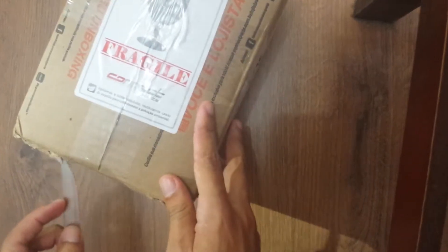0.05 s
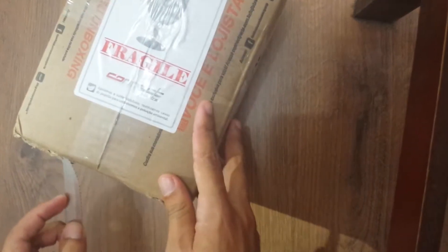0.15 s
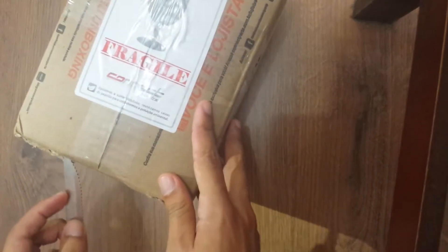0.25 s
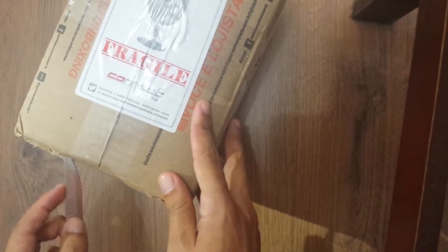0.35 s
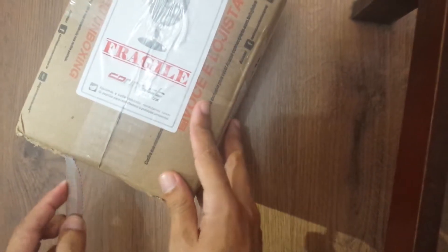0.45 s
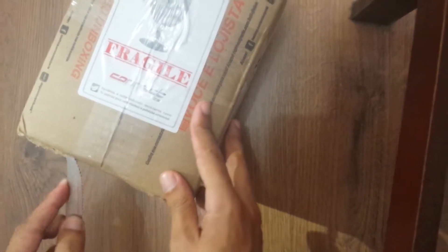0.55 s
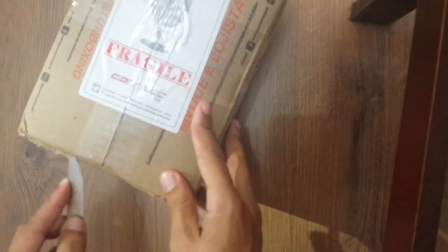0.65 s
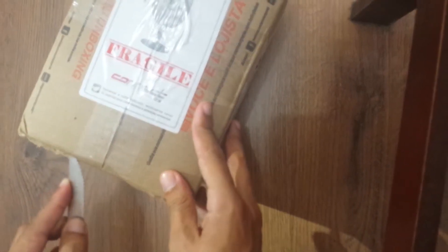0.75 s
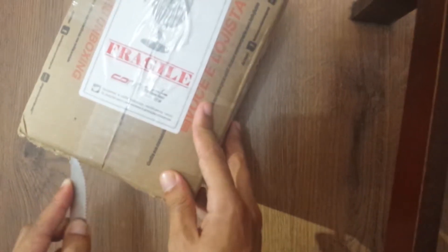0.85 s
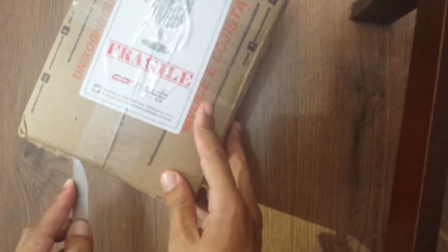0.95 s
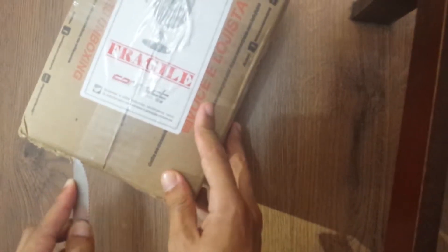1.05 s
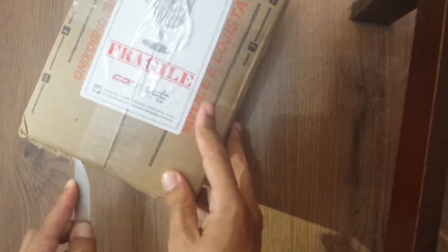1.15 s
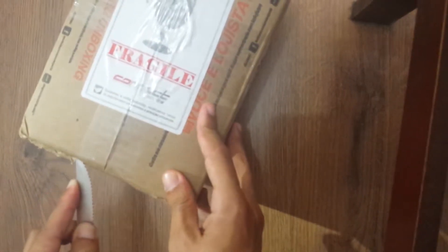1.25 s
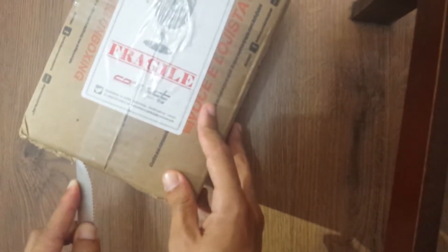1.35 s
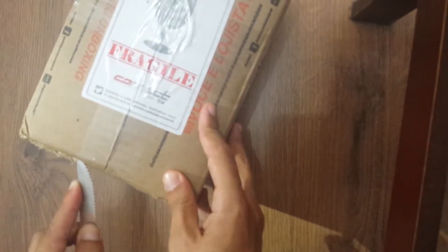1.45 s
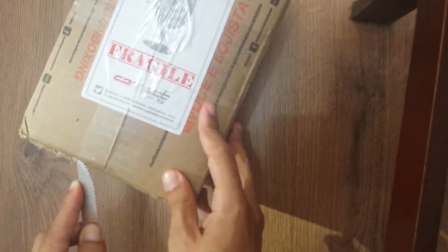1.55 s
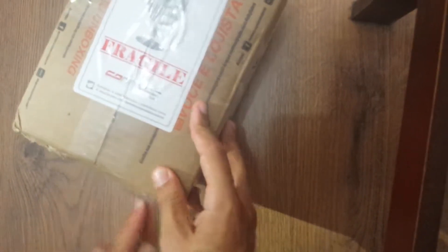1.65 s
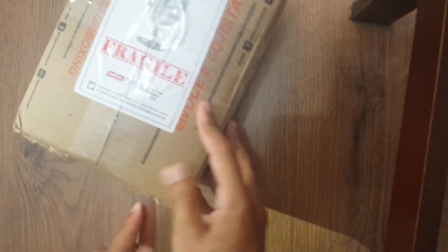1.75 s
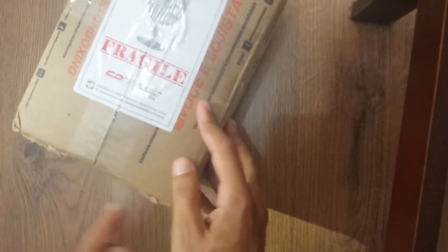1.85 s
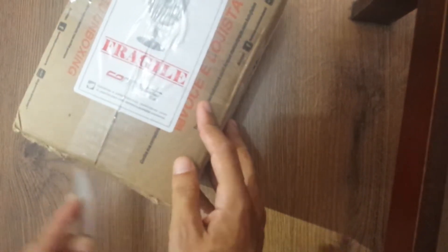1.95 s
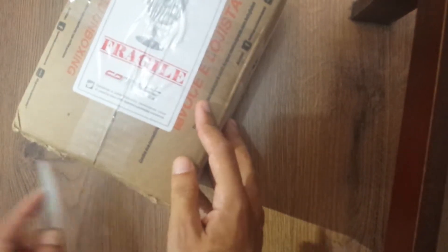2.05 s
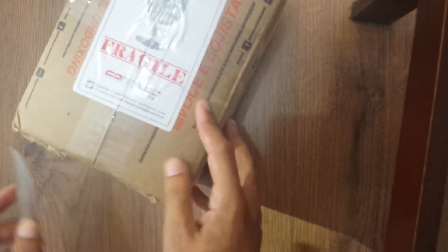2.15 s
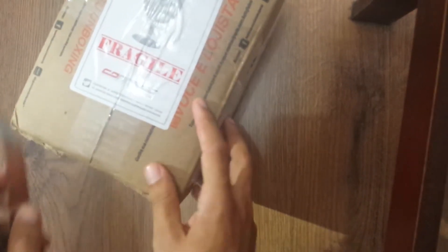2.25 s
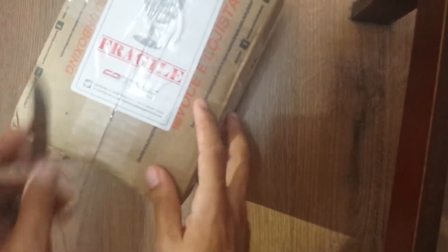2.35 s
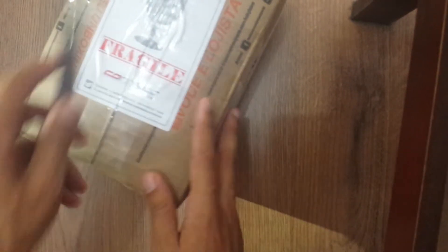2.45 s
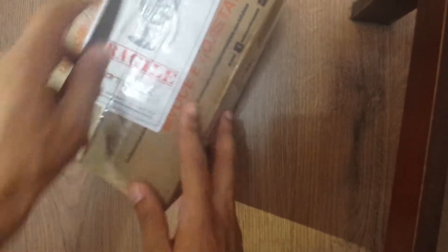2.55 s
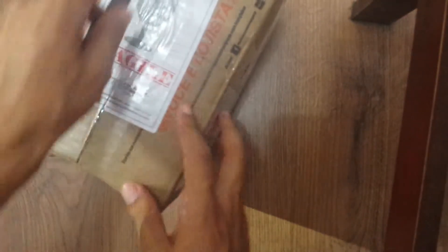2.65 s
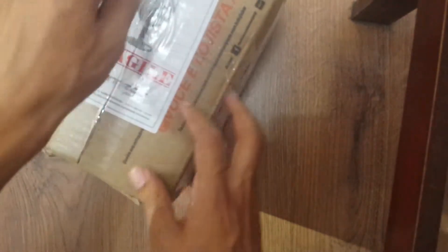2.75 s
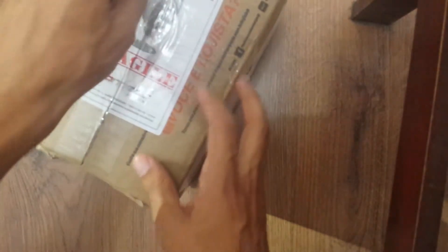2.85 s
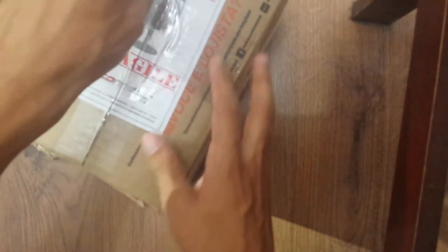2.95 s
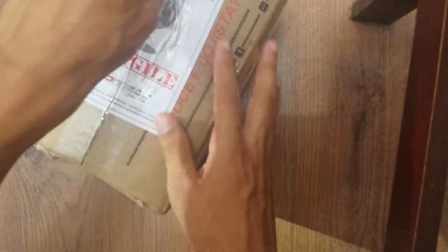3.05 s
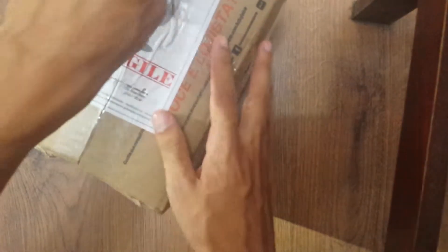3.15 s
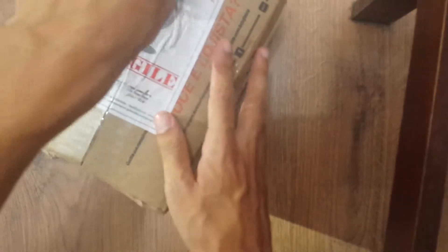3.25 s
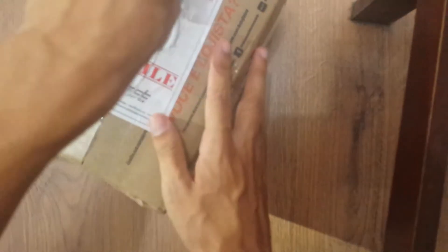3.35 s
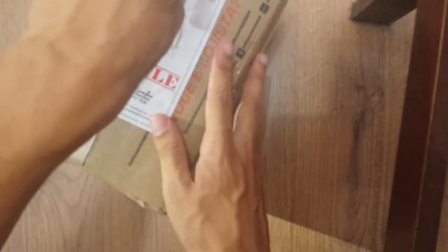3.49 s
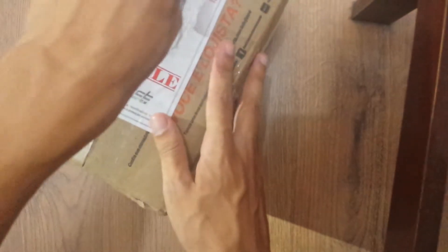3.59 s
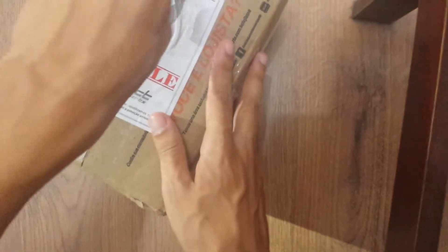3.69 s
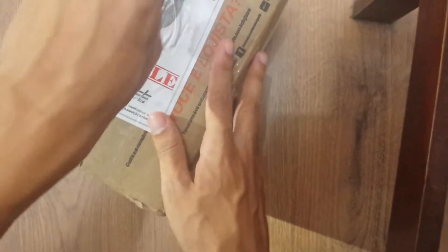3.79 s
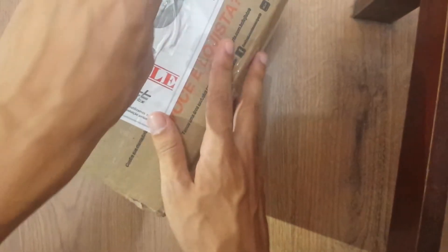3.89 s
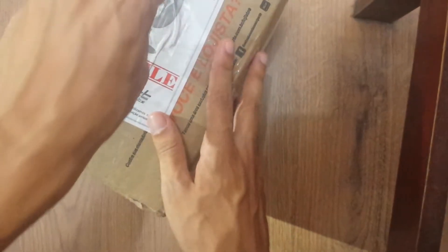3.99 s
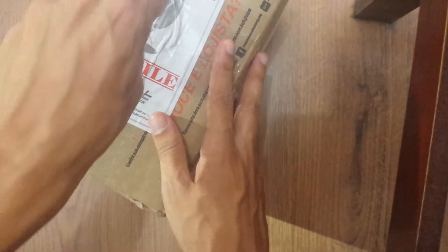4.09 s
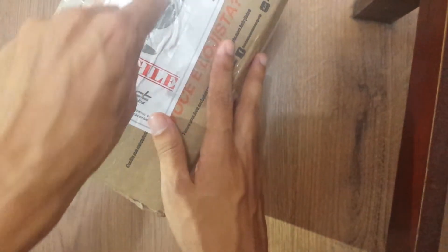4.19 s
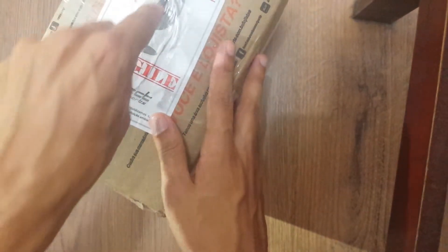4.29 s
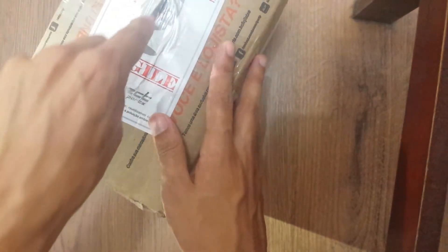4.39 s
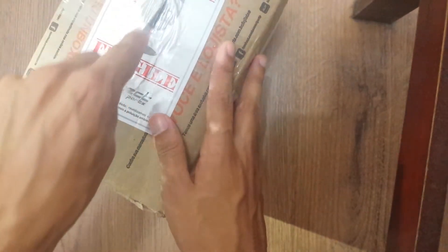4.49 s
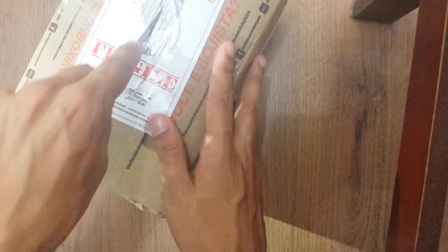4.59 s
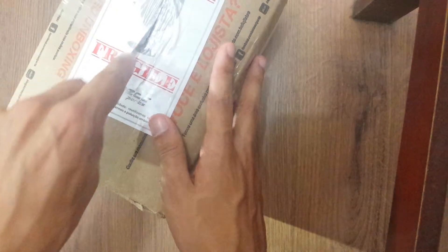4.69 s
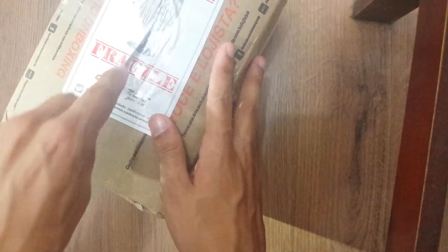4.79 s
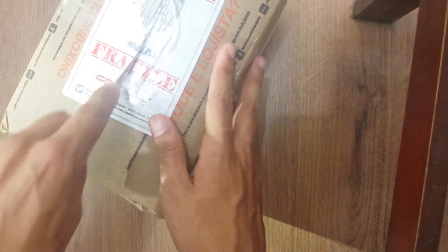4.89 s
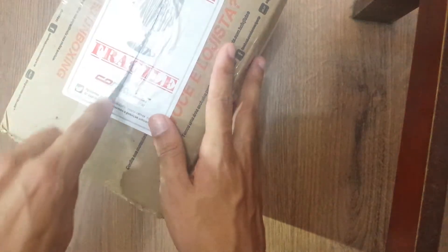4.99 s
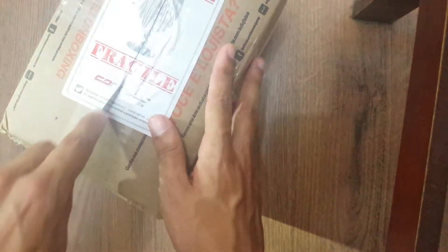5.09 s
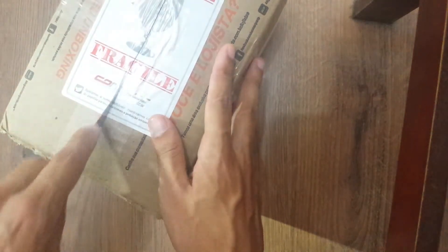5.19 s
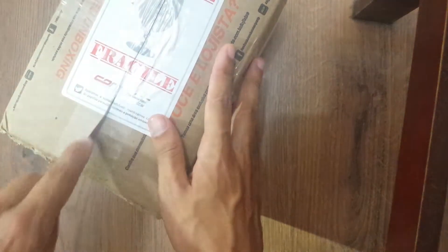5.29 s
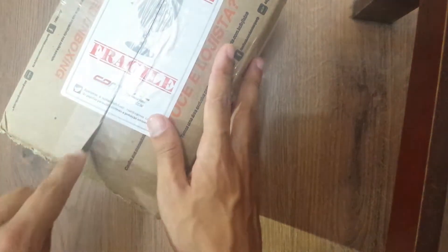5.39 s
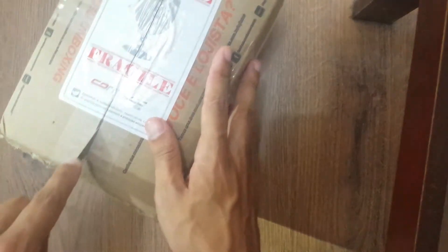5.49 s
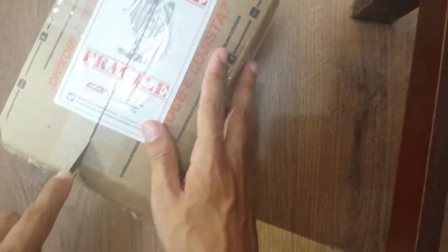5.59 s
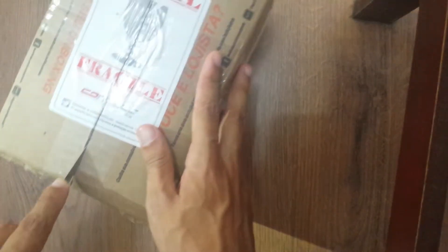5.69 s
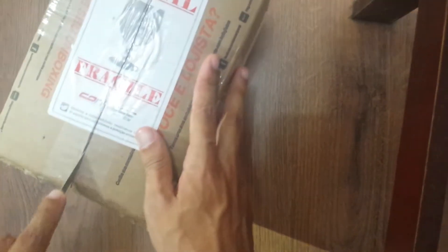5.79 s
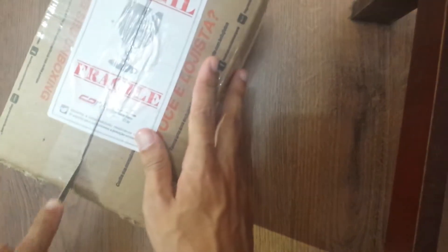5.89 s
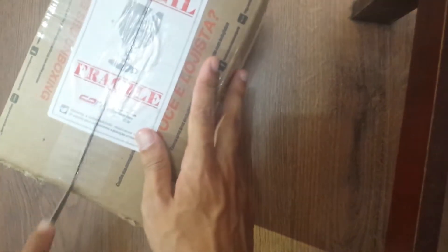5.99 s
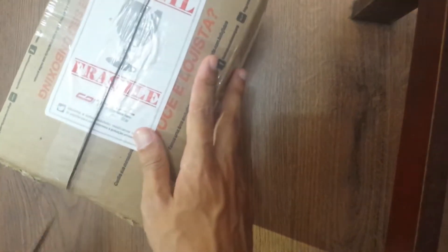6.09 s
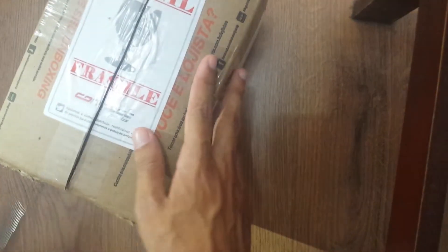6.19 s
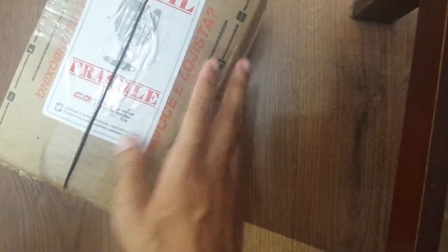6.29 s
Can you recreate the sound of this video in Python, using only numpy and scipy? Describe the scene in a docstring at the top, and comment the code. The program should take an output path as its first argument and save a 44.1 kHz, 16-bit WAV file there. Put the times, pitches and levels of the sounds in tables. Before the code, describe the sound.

In a small bare room with a faint electrical hum, a cardboard box is cut open near the microphone. Quiet finger rubs come first, then one sharp clack and short scrape of a knife on floorboards. The tip snaps through the tape, and a scratchy, crackling cut runs through tape and paper while the hollow box thumps underneath. A short high squeak and a final rip finish the cut.

```python
"""Fingers tick and scuff on a cardboard box. At 1.7 s a kitchen knife knocks and scrapes as it is picked
up from a wooden floor. At 3.6 s its tip pops through the taut box tape; the edge rasps along the seam
and through a paper label, the hollow box booming below. At 5.3 s the blade sticks and squeaks in the
film; at 6.1 s it tears out at the far end. Throughout: small bare room, faint mains hum."""
import sys
import numpy as np
from scipy import signal
from scipy.fft import rfft, irfft, next_fast_len
from scipy.io import wavfile
from scipy.ndimage import map_coordinates

SR = 44100
rng = np.random.default_rng(int(sys.argv[2]) if len(sys.argv) > 2 else 0)


def unload_audio(sound):
    """Save the sound as a 16-bit wav file, at the path given as the first command line argument."""
    columns = np.transpose(np.atleast_2d(sound))
    # keep every value between -1 and 1, then stretch to whole-number steps
    steps = np.round(np.clip(columns, -1, 1) * 32767)
    wavfile.write(sys.argv[1], SR, steps.astype(np.int16))


N = 279324

# Event levels are relative within a table; spectra are per Hz.
CUT_EFFORT = [(3.61, -44), (3.84, -48.5), (3.95, -39), (4.14, -42.5), (4.3, -40.5), (4.551, -42),
              (4.68, -49), (4.76, -43), (4.89, -42.5), (5.05, -43), (5.24, -36), (5.45, -36), (5.57, -43.5),
              (5.78, -40.5), (5.92, -49.5), (5.99, -41), (6.137, -31.5)]  # draw along the seam: t/s, level/dB
PAPER_GAINS_DB = (-1.5, 0.5, -2)  # edge in the label: rasp/dB, box/dB, hiss/dB
TAPE_GAINS_DB = (-1, -5, 2)  # edge in bare tape: rasp/dB, box/dB, hiss/dB
FIBRE_TEARS = [(3.626, 0.014, -26), (3.972, 0.0022, -37), (4.2, 0.016, -33), (5.09, 0.014, -24.5),
               (6.135, 0.0069, -30)]  # fibres tear in a rush: t/s, half length/s, level/dB
RASP_SPECTRUM = [(410, -24), (700, -9), (922, -5.5), (1210, -9.5), (3160, -8.5), (3640, -6), (7010, -4.5),
                 (8310, -7.5), (13300, -5), (15000, -31), (16000, -48)]  # edge in the seam: f/Hz, level/dB
FILM_MODES = [(6600, 2800, -12), (8450, 1300, 2), (9940, 1200, -5.5), (10800, 2300, -10),
              (13100, 1300, -17)]  # taut tape: f/Hz, width/Hz, level/dB
BOX_MODES = [(209.6, 29, -4), (293, 17, -2), (330.4, 23, -2.5), (509, 157, -7), (636, 85, -6),
             (666, 33, -0.5), (786, 66, -2.5), (956, 35, -3), (1060, 42, -5), (1316, 310, -13.5),
             (1820, 120, -7), (1920, 840, -14.5)]  # hollow box: f/Hz, width/Hz, level/dB
# light handling ticks first, then tape and paper cracking under the knife: t/s, crack/dB, box/dB
SNAPS_AND_TICKS = [(0.085, -36.5, -44), (0.863, -43.5, -58), (0.988, -34, -65), (1.281, -56, -64),
                   (3.287, -44, -40.5), (3.479, -36, -59), (3.499, -25, -36), (3.603, -6, -45),
                   (3.675, -14.5, -38.5), (3.778, -24.5, -63), (3.9565, -8.5, -35), (3.971, -9.5, -55),
                   (4.057, -21.5, -25), (4.180, -8.5, -22), (4.219, -12, -25), (4.3137, -21, -27.5),
                   (4.446, -27, -28.5), (4.7145, -28, -35), (4.9772, -18, -24), (5.070, -19, -19),
                   (5.076, -9.5, -13.5), (5.086, -10.5, -16), (5.101, -16, -28.5), (5.512, -21, -53),
                   (5.550, -22, -45), (5.964, -25.5, -42), (6.115, -13, -30.5), (6.132, -10.5, -27)]
CRACK_SPECTRUM = [(250, -19), (500, -8.5), (1000, -13.5), (2000, -8.5), (3200, -9.5), (4000, -9.5),
                  (5500, -8), (8600, -3.5), (13000, -8.5), (16000, -10.5)]  # one snap or tick: f/Hz, level/dB
BLADE_GRABS = [(5.255, 0.004, -34), (5.305, 0.019, -26.5), (5.339, 0.0073, -19.5), (5.351, 0.0056, -18.5)]  # blade sticks in the film: t/s, half length/s, level/dB
BLADE_MODES = [(8680, 190, -6), (10350, 100, -4), (13200, 35, -10), (13200, 34, 5), (14360, 45, -2),
               (14280, 54, 2), (15300, 41, -2)]  # thin steel: f/Hz, width/Hz, level/dB
SQUEAL_SPECTRUM = [(2940, -66), (5000, -47), (7380, -18), (8290, -7), (9880, -1), (10900, -3), (13300, 8),
                   (15100, 0.5), (16000, -23)]  # film on steel: f/Hz, level/dB

FLOOR_CLACKS = [(1.702, -6), (1.7038, -15), (1.713, -13.5), (1.722, -14), (1.7373, -8.5), (1.7579, -24)]  # blade hits the floor: t/s, level/dB
FLOOR_SLIDES = [(1.698, 0.051, -27), (1.85, 0.012, -38), (1.948, 0.0031, -45.5)]  # one slide, two grazes: t/s, length/s, level/dB
FLOOR_SPECTRUM = [(40, -30), (70, -7), (150, -16), (212, 3), (310, -10), (420, -21), (610, -11), (760, -15),
                  (1300, -11), (3000, -14.5), (5500, -9.5), (8200, -5.5), (13000, -14), (15800, -21)]  # blade on boards: f/Hz, level/dB
PANEL_BUMPS = [(1.281, -38, 307), (1.757, -28.5, 265), (2.381, -42, 310), (2.484, -43, 293),
               (2.723, -45.5, 308), (3.108, -44.5, 214), (3.271, -35.5, 170), (3.497, -47, 233),
               (4.056, -21, 293), (4.184, -23.5, 367), (4.933, -31, 234), (5.092, -17.5, 208),
               (6.139, -23.5, 175)]  # box flexes: t/s, level/dB, f/Hz
BOX_BRUSHES = [(0.1, 0.016, -52), (0.26, 0.0094, -55), (0.52, 0.11, -68), (0.83, 0.068, -65.5),
               (0.975, 0.02, -53.5), (1.565, 0.01, -63.5), (2.43, 0.14, -62.5), (2.63, 0.082, -54.5),
               (2.98, 0.19, -64), (3.42, 0.27, -67.5)]  # fingers and blade on cardboard: t/s, half length/s, level/dB
BRUSH_SPECTRUM = [(250, -14), (450, -6.5), (750, -8.5), (1200, -7.5), (2200, -14), (4000, -13),
                  (8400, -7.5), (13500, -16), (16000, -25)]  # skin on cardboard: f/Hz, level/dB
FINGER_SCUFFS = [(0.083, -53.5, 960, 0.21), (0.442, -60, 473, 0.16), (0.827, -58, 1280, 0.033),
                 (0.859, -47.5, 1500, 0.0072), (1.294, -58, 850, 0.015), (2.486, -42.5, 820, 0.02)]  # fingers shift: t/s, level/dB, f/Hz, 30 dB decay/s

HAND_HOLDS = [(1.6, 2.3, -65), (3.9, 1.6, -53), (6.12, 0.03, -45.5)]  # box rumbles under hand and knife: t/s, length/s, level/dB
RUMBLE_SPECTRUM = [(15, -4.5), (45, -23), (72, 2), (100, -4.5), (125, 3), (170, -13.5), (400, -52),
                   (1000, -94)]  # handling rumble: f/Hz, level/dB
AIR_SPECTRUM = [(20, -16), (45, -10.5), (75, -2), (125, -5.5), (190, -13), (285, -7), (370, -16.5),
                (480, -12.5), (700, -20.5), (1100, -19), (2000, -26), (4000, -25.5), (14500, -27),
                (16000, -32)]  # room air: f/Hz, level/dB
ECHO_DECAY = [(100, 0.4), (300, 0.49), (1000, 0.35), (4000, 0.34), (9000, 0.35), (15000, 0.27)]  # room decay: f/Hz, T60/s
ECHO_SPECTRUM = [(100, -7), (300, -1.5), (1000, -2.5), (4000, -1.5), (9000, -7.5), (12000, -9.5),
                 (15500, -17.5)]  # wall echo: f/Hz, level/dB
COHERENCE = [(25, 0.24), (70, 0.95), (130, 0.88), (250, 0.88), (500, 0.26), (1000, 0), (16000, 0.01)]  # diffuse field: f/Hz, left-right correlation/1
LEFT_SHADOW = [(150, -3), (350, 3.5), (700, -5), (2000, -7), (6000, -82), (13000, -39)]  # direct sound, left against right: f/Hz, level/dB


def cutting():
    """The edge parts film and fibres in dense slips; its grip wavers and shakes the box."""
    rasp_gain, box_gain, hiss_gain = seam_gains()
    grip = unit(amp(1.43 * wobble(30) + 2.96 * wobble(160)))
    slips = grip * friction(rate_hz=1400, spread_db=1.0, smooth=0.62)
    tearing = swells(FIBRE_TEARS) * friction(rate_hz=2100, spread_db=11, smooth=0.14)
    seam = coloured(rasp_gain * slips + tearing, RASP_SPECTRUM)
    hiss = hiss_gain * grip * friction(rate_hz=900, spread_db=-2.0, smooth=0.62)
    film = np.zeros(N)
    for hz, width_hz, db in FILM_MODES:  # modes come forward at random as the edge travels
        drift = unit(amp(3.1 * wobble(13)))
        film += amp(db) * resonate(hiss * drift, [(hz, width_hz, 0)])
    drag = amp(-3) * box_gain * grip * friction(rate_hz=580, spread_db=11.5, smooth=0.23)
    return seam + amp(-3.5) * film + resonate(drag + amp(-13) * tearing, BOX_MODES)


def seam_gains(label_from_s=3.82, label_to_s=5.24, edge_s=0.017):
    """Paper drags on the box, bare tape hisses; both follow the effort. Gains: rasp, box, hiss."""
    t = np.arange(N) / SR
    s, db = np.transpose(CUT_EFFORT)
    gate = strokes([(s[0], s[-1] - s[0], 0)], attack_s=0.031, release_s=0.0069)
    effort = amp(np.interp(t, s, db)) * gate
    in_label = (np.tanh((t - label_from_s) / edge_s) - np.tanh((t - label_to_s) / edge_s)) / 2
    return [effort * amp(tape + (paper - tape) * in_label)
            for paper, tape in zip(PAPER_GAINS_DB, TAPE_GAINS_DB)]


def snaps_and_ticks():
    """Light handling ticks, then tape and paper cracking under the knife; each rings the box."""
    cracks, kicks = np.zeros(N), np.zeros(N)
    for s, crack_db, box_db in list(SNAPS_AND_TICKS) + fibres():
        t60_s = 0.027 * 10 ** ((crack_db + 11) / 40)  # louder ones last longer
        add(cracks, s, amp(crack_db + 16.5) * fracture(t60_s, crumble=2.35))
        add(kicks, s, amp(box_db + 23) * fracture(t60_s=0.0052, crumble=0.98))
    return coloured(cracks, CRACK_SPECTRUM) + resonate(kicks, BOX_MODES)


def fibres(rate_hz=16, crack_db=9.5, box_db=-3.5):
    """Single fibres snap at random, as hard as the edge is pressed. Rows: t/s, crack/dB, box/dB."""
    s, db = np.transpose(CUT_EFFORT)
    hits = np.flatnonzero(rng.random(N) < rate_hz / SR)
    scatter_db = np.clip(rng.standard_normal((N, 2)), -2, 2)[hits]
    levels_db = np.interp(hits / SR, s, db)[:, None] + scatter_db + [crack_db, box_db]
    return [(at, crack, box) for at, (crack, box) in zip(hits / SR, levels_db) if s[0] < at < s[-1]]


def squeak(stutter_hz=165, depth_db=3):
    """Sticky film grabs the blade in stuttering bursts that ring the thin steel."""
    stutter = np.sin(2 * np.pi * stutter_hz * np.arange(N) / SR + wobble(60))
    grab = swells(BLADE_GRABS) * unit(amp(depth_db * stutter + 3 * wobble(900)))
    steel = resonate(grab * rng.standard_normal(N), BLADE_MODES)
    film = coloured(grab * rng.standard_normal(N), SQUEAL_SPECTRUM)
    return amp(-2) * steel + amp(0.5) * film


def knife_pickup():
    """The blade clacks on the boards and chatters as it slides off. Returns clacks, slide."""
    blows = np.zeros(N)
    for s, db in FLOOR_CLACKS:
        add(blows, s, amp(db + 14) * fracture(t60_s=0.011, crumble=1.0))
    contact = strokes(FLOOR_SLIDES, attack_s=0.0083, release_s=0.028)
    slide = contact * friction(rate_hz=1200, spread_db=1.5, smooth=0.41)
    return coloured(blows, FLOOR_SPECTRUM), coloured(slide, FLOOR_SPECTRUM)


def bumps(t60_s=0.037, rise_s=0.0031, lowpass_hz=900):
    """A soft push swings a cardboard panel for a few cycles and stirs the lower box modes."""
    panel, kicks = np.zeros(N), np.zeros(N)
    t = np.arange(SR // 8) / SR
    for s, db, hz in PANEL_BUMPS:
        envelope = amp(db + 5.5 - 60 * t / t60_s) * (1 - np.exp(-t / rise_s))
        add(panel, s, envelope * np.sin(2 * np.pi * hz * t))
        add(kicks, s, amp(db + 13) * fracture(t60_s=0.018, crumble=0.86))
    pushes = signal.lfilter(*signal.butter(2, lowpass_hz, fs=SR), kicks)
    return panel + resonate(pushes, BOX_MODES)


def brushing():
    """Skin slides lightly over cardboard."""
    rub = swells(BOX_BRUSHES) * friction(rate_hz=700, spread_db=-1.5, smooth=0.56)
    return amp(3.5) * coloured(rub, BRUSH_SPECTRUM)


def scuffs(q=3.5):
    """Fingers shift: short rubs, one broad resonance each."""
    out, t = np.zeros(N), np.arange(SR // 8) / SR
    for s, db, hz, decay_s in FINGER_SCUFFS:
        rub = signal.lfilter(*signal.iirpeak(hz, q, SR), rng.standard_normal(len(t)))
        add(out, s, amp(db - 30 * t / decay_s) * unit(rub))
    return out


def direct(x, lag_s=0.00037):
    """Sound reaches the right side first; the left is shadowed."""
    def response(hz):
        left = amp(along(LEFT_SHADOW, hz)) * np.exp(-2j * np.pi * hz * lag_s)
        return np.array([left, np.ones_like(hz)])
    return filtered(x, response)


def room(x, build_s=0.016, early_gain=0.84, patterns=8):
    """Bare walls answer; the echo pattern shifts every 40 ms, as for a moving blade."""
    active = np.arange(N) // (SR // 25) % patterns
    out = np.zeros((2, N))
    for k in range(patterns):
        hz, t, noise = signal.stft(rng.standard_normal((2, SR // 2)), SR, nperseg=256)
        onset = np.where(t < build_s, early_gain, 1) * (t > 0)
        decay = onset * amp(-60 * t / along(ECHO_DECAY, hz)[:, None])
        band_norm = np.sqrt(np.mean(decay ** 2, axis=1, keepdims=True) * SR / 2)
        shape = amp(along(ECHO_SPECTRUM, hz))[:, None] * decay / band_norm
        tail = diffuse(signal.istft(noise * shape, SR, nperseg=256)[1])
        out += signal.oaconvolve((x * (active == k))[None], tail, axes=1)[:, :N]
    return out


def background(air_db=-62.5, rest_db=-71.5, hum_db=-61.5, hum_hz=120):
    """Still room air, rumble that swells as the box is handled, mains hum."""
    air = diffuse(np.array([unit(coloured(rng.standard_normal(N), AIR_SPECTRUM)) for _ in range(2)]))
    rumble = diffuse(np.array([coloured(rng.standard_normal(N), RUMBLE_SPECTRUM) for _ in range(2)]))
    handling = amp(rest_db) + strokes(HAND_HOLDS, attack_s=0.42, release_s=0.27)
    hum_gain = amp(hum_db + 0.35 * wobble(0.87))
    hum = np.sin(2 * np.pi * hum_hz * np.arange(N) / SR + 0.94 * wobble(1.282))
    return amp(air_db) * air + handling * rumble + hum_gain * hum


def friction(rate_hz, spread_db, smooth):
    """Tiny random slips of uneven size over smooth rubbing noise, rms 1."""
    slips = (rng.random(N) < rate_hz / SR) * rng.choice([-1, 1], N)
    sizes = amp(spread_db * np.minimum(rng.standard_normal(N), 2))
    return unit(unit(slips * sizes) + smooth * rng.standard_normal(N))


def fracture(t60_s, crumble):
    """One sharp impulse, then a brief crumbling tail; energy 1."""
    t = np.arange(SR // 25) / SR
    grains = rng.standard_normal(len(t)) * np.abs(rng.standard_normal(len(t)))
    tail = grains * amp(-60 * t / t60_s)
    burst = crumble * tail / np.linalg.norm(tail)
    burst[0] = 1
    return burst / np.linalg.norm(burst)


def resonate(x, modes, size=16384):
    """x through parallel resonances; keeps the power of white noise."""
    f = np.fft.rfftfreq(size, 1 / SR)
    response = sum((-1) ** k * amp(db) * 1j * f * width / (hz * hz - f * f + 1j * f * width)
                   for k, (hz, width, db) in enumerate(modes))
    kernel = irfft(response)
    return signal.oaconvolve(x, kernel / np.linalg.norm(kernel))[:N]


def coloured(x, spectrum, size=8192):
    """x through a minimum-phase filter of energy 1 with this spectrum."""
    magnitude = amp(along(spectrum, np.fft.rfftfreq(size, 1 / SR)))
    cepstrum = irfft(np.log(magnitude + 1e-6))
    cepstrum[1:size // 2] *= 2
    cepstrum[size // 2 + 1:] = 0
    kernel = irfft(np.exp(rfft(cepstrum)))
    return signal.oaconvolve(x, kernel / np.linalg.norm(kernel))[:N]


def filtered(x, response):
    """x through a complex frequency response."""
    size = next_fast_len(N + SR // 2, True)
    return irfft(rfft(x, size) * response(np.fft.rfftfreq(size, 1 / SR)), size)[..., :N]


def diffuse(pair):
    """Two unrelated sounds become alike in the bass, as at two close points."""
    size = pair.shape[1]
    correlation = along(COHERENCE, np.fft.rfftfreq(size, 1 / SR))
    angle = np.arccos(np.clip(correlation, -1, 1)) / 2
    mid, side = irfft(rfft(pair) * [np.cos(angle), np.sin(angle)], size)
    return np.array([mid + side, mid - side])


def strokes(rows, attack_s, release_s):
    """Gain curve of held levels; attack and release times are per 20 dB."""
    t = np.arange(N) / SR
    gain = np.zeros(N)
    for s, length_s, db in rows:
        before = np.maximum((s - t) / attack_s, 0)
        after = np.maximum((t - s - length_s) / release_s, 0)
        gain += amp(db - 20 * (before + after))
    return gain


def swells(rows):
    """Gain curve of bell-shaped surges."""
    t = np.arange(N) / SR
    return sum(amp(db) / np.cosh(np.clip((t - s) / half_s, -20, 20)) ** 2 for s, half_s, db in rows)


def wobble(rate_hz):
    """Smooth curve through random knots."""
    knots = rng.standard_normal(int(N * rate_hz / SR) + 4)
    return map_coordinates(knots, [np.arange(N) * rate_hz / SR])


def along(points, hz):
    """Rows of f/Hz, value, interpolated on a log axis."""
    f, values = np.transpose(points)
    return np.interp(np.log(hz + 1), np.log(f + 1), values)


def add(track, at_s, x):
    """Mix x into the track."""
    part = track[round(at_s * SR):][:len(x)]
    part += x[:len(part)]


def amp(db):
    """dB to gain."""
    return 10 ** (np.asarray(db) / 20)


def unit(x):
    """x at rms 1."""
    return x / np.sqrt(np.mean(x ** 2) + 1e-20)


def scene():
    """Knife and box, heard directly from the right and off the walls, over the background."""
    clacks, slide = knife_pickup()
    pops, thuds, squeal = snaps_and_ticks(), bumps(), squeak()
    rasp = cutting() + brushing() + scuffs()
    near = amp(-2.5) * clacks + amp(-1) * slide + amp(-2) * pops + thuds + amp(-2) * rasp + squeal
    to_walls = (amp(-0.5) * clacks + amp(1.5) * slide + amp(-1.5) * pops
                + amp(-2) * thuds + amp(-0.5) * rasp + amp(1.5) * squeal)
    return direct(near) + room(to_walls) + background()


def record(dry):
    """Soft clip of the tallest peaks, then a steep low-pass."""
    ceiling, top_hz = 0.93, 15750
    rounded = dry / (1 + (dry / ceiling) ** 4) ** (1 / 4)
    return filtered(rounded, lambda hz: 1 / np.sqrt(1 + (hz / top_hz) ** 160))


dry = scene()
out = record(dry)
unload_audio(out)
```